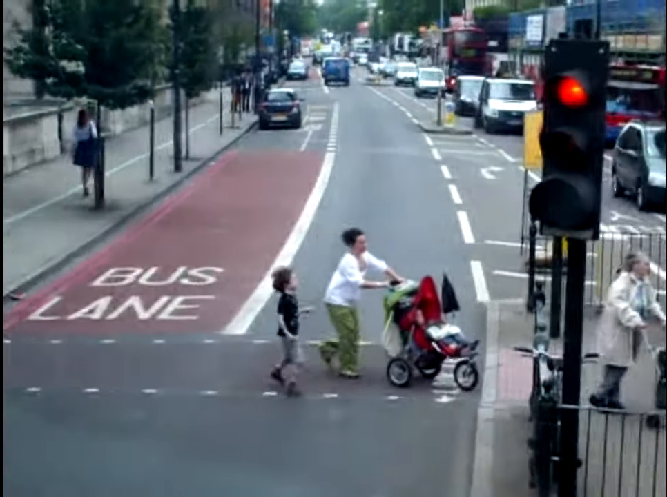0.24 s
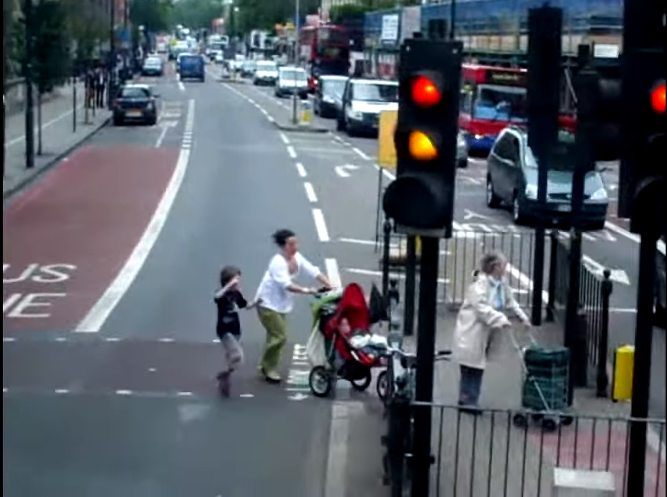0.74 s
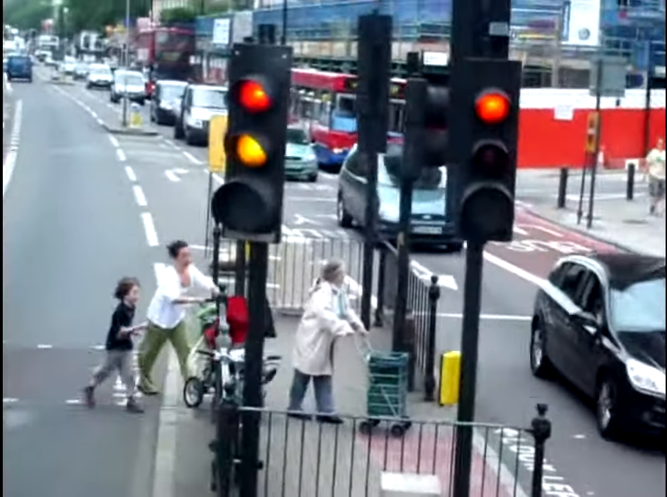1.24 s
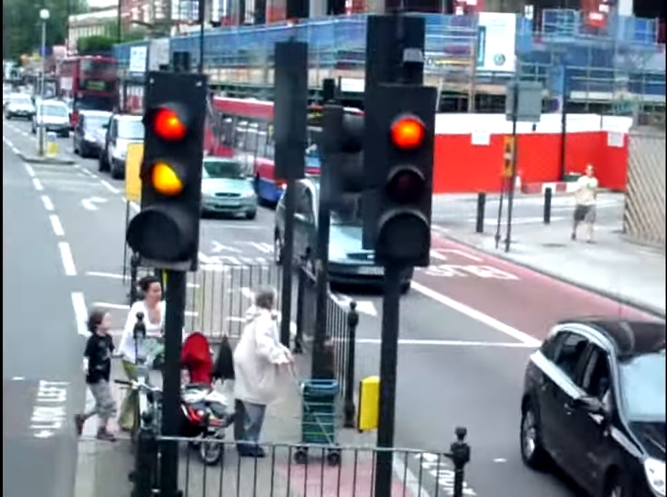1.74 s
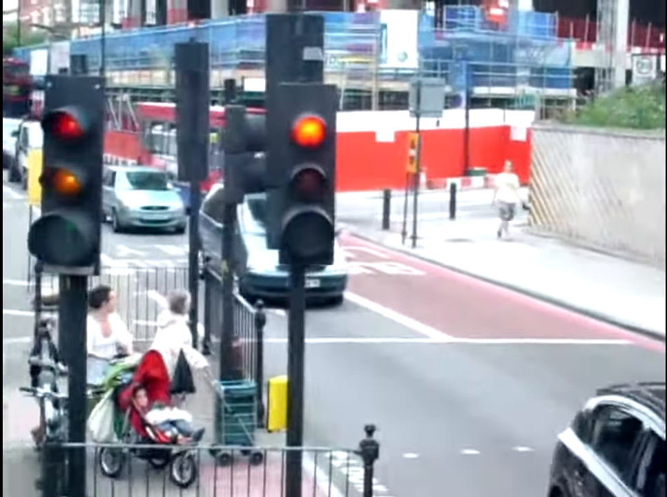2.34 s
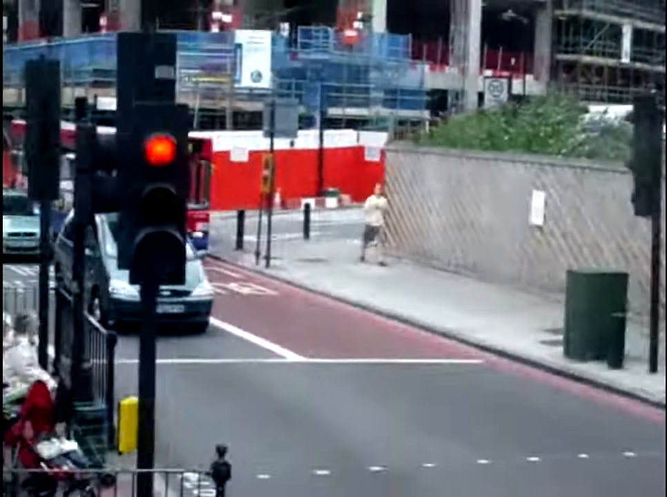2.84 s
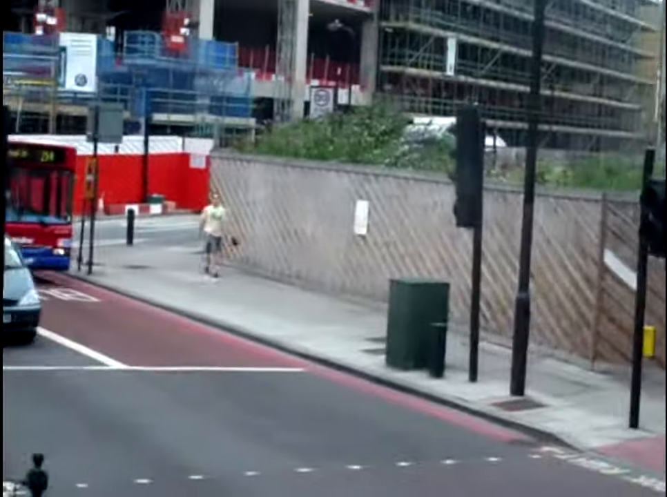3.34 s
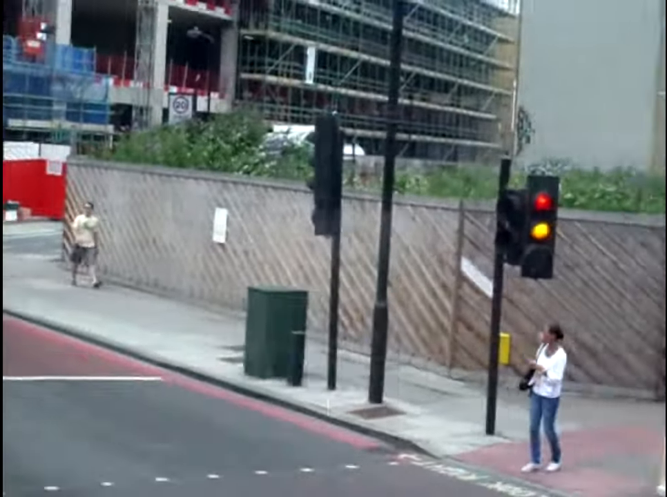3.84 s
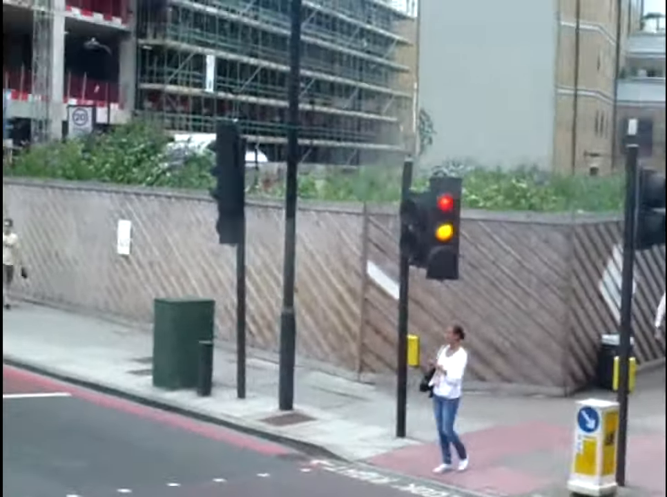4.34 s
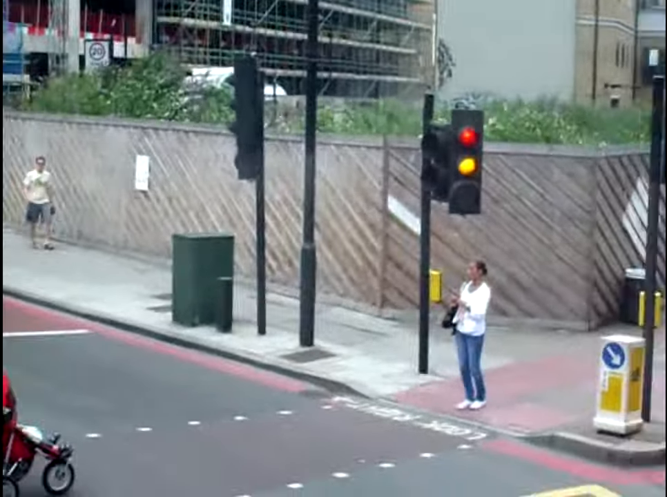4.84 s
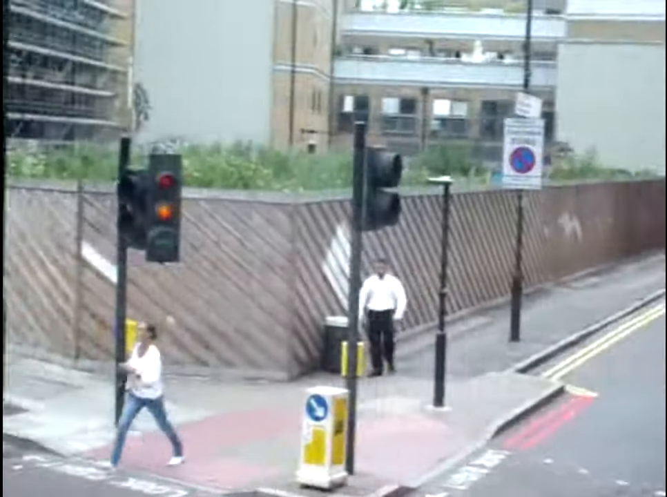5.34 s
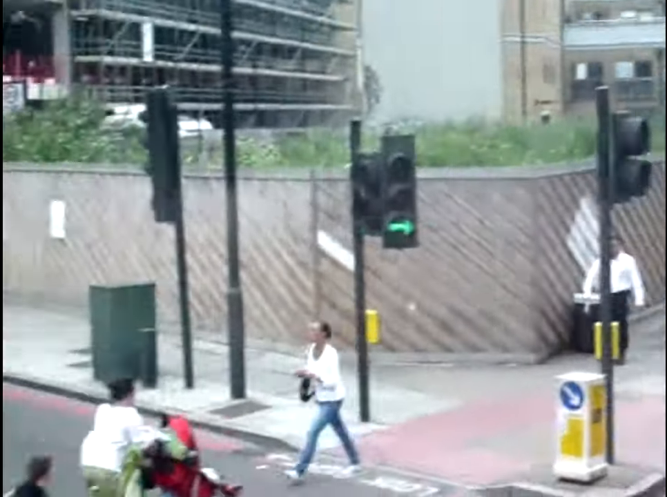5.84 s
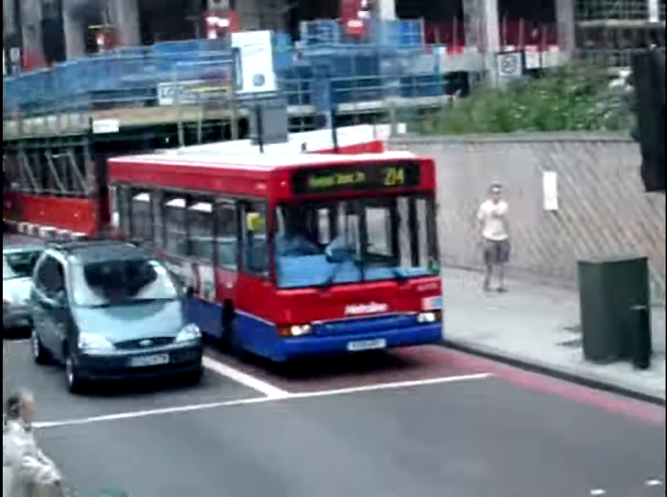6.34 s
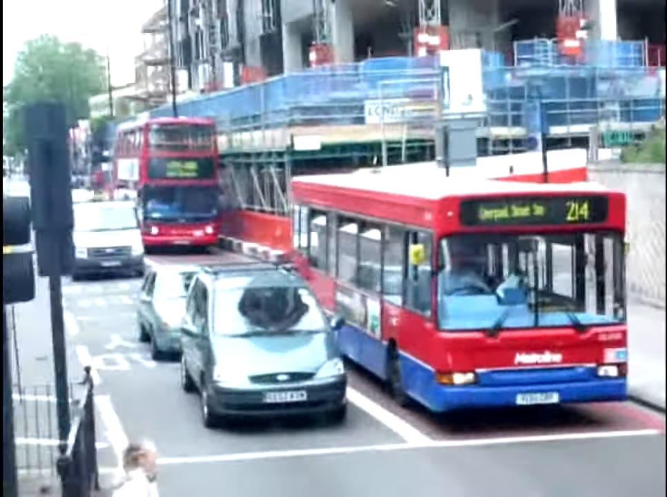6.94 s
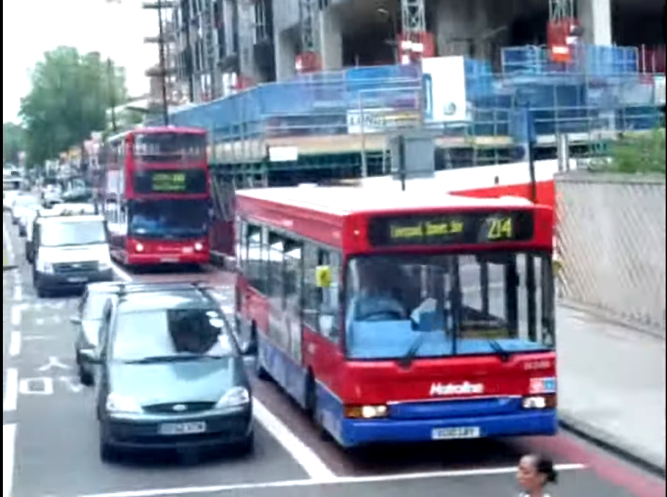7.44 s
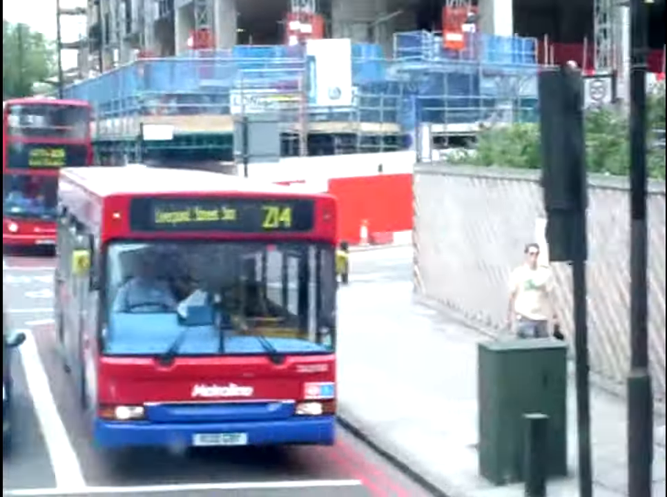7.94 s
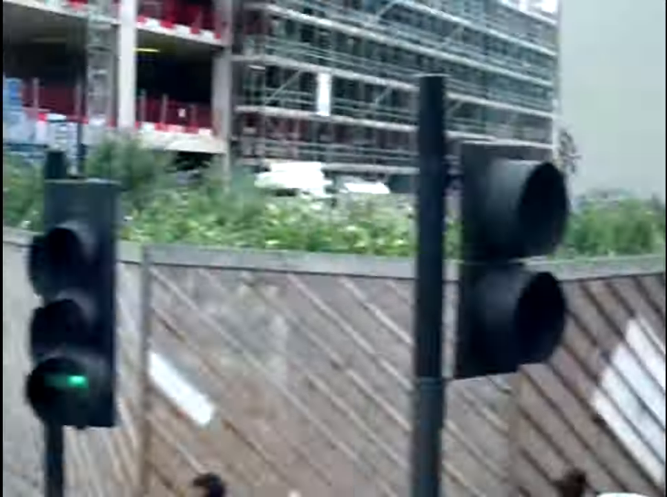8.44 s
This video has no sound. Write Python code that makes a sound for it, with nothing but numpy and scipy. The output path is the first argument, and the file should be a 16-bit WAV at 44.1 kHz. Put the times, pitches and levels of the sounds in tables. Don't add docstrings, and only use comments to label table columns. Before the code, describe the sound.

A small microphone in a bus cabin picks up low, booming engine idle over soft hiss. Distant brakes chirp thinly. Then the bus pulls away: the rumble lurches upward and keeps rising, noise from traffic and tyres grows, panels vibrate, loose trim clicks over bumps, and a fitting gives tiny high squeaks at the end.

```python
import sys
import numpy as np
from scipy import signal
from scipy.fft import rfft, irfft, next_fast_len
from scipy.io import wavfile
from scipy.ndimage import uniform_filter1d, map_coordinates

SR = 44100
rng = np.random.default_rng(int(sys.argv[2]) if len(sys.argv) > 2 else 0)


def to_wav(s):
    ch = np.atleast_2d(s).T
    pcm = np.round(np.clip(ch, -1, 1) * 32767)
    wavfile.write(sys.argv[1], SR, pcm.astype(np.int16))


def linear_from_db(decibels):
    return 10 ** (np.asarray(decibels, float) / 20)


N = 383669


def unit(x):
    return x / np.sqrt(np.mean(x ** 2) + 1e-20)


def along(points, hz):
    f, v = np.transpose(points)
    return np.interp(np.log(hz + 1), np.log(f + 1), v)


def curves(rows):
    s, *cols = np.transpose(rows)
    return [np.interp(np.arange(N) / SR, s, c) for c in cols]


def wobble(rate):
    return map_coordinates(rng.standard_normal(int(N * rate / SR) + 4), [np.arange(N) * rate / SR])


def bell(s, width):
    return np.exp(-((np.arange(N) / SR - s) / width) ** 2)


def filtered(x, response):
    m = next_fast_len(N + SR // 2)
    return irfft(rfft(x, m) * response(np.fft.rfftfreq(m, 1 / SR)), m)[..., :N]


def resonance(f, hz, width):
    return 1j * f * width / (hz * hz - f * f + 1j * f * width)


def rush(spectrum, patchy_db):
    z = signal.stft(rng.standard_normal(N), nperseg=512)[2]
    across_hz = uniform_filter1d(rng.standard_normal(z.shape), 6, 0)
    patches = unit(uniform_filter1d(across_hz, 14, 1))
    noise = signal.istft(z * linear_from_db(patchy_db * patches), nperseg=512)[1][:N]
    return unit(filtered(noise, lambda hz: linear_from_db(along(spectrum, hz))))


def tone(turns, db, flutter_db, smear, rate, free=1):
    phase = 2 * np.pi * (turns + free * rng.random()) + smear * wobble(rate)
    return np.sqrt(2) * linear_from_db(db + flutter_db * wobble(rate)) * np.cos(phase)


def glide(event, over_db, bend, edge_db, fall_db):
    s, length, from_hz, to_hz, db = event
    u = np.linspace(0, 1, 12)
    hz = from_hz + (to_hz - from_hz) * np.sin(bend * u) / np.sin(bend)
    level = db - edge_db * (2 * u - 1) ** 2 - fall_db * u
    return np.transpose([s + length * u, hz, *[level + d for d in over_db]])


def passing(rows, multiples, fade, **rough):
    hz, *levels = curves(rows)
    t = np.arange(N) / SR
    inside = np.minimum(t - rows[0][0], rows[-1][0] - t)
    gate = np.clip(inside / fade + 1, 0, 1)
    return gate * sum(tone(k * np.cumsum(hz) / SR, db, **rough) for k, db in zip(multiples, levels))


IDLE_HZ = 33
# time in seconds, firing rate in Hz.
ENGINE_SPEED = [(0, 33), (1.5, 32.85), (2.6, 32.8), (2.95, 32.95), (3.15, 34), (3.45, 36.8), (3.8, 41.2),
                (4.2, 45.6), (4.6, 49.2), (5, 53), (5.2, 54), (5.8, 58.1), (6.4, 62.1), (7.2, 68.2),
                (7.75, 69.7), (8.2, 72.9), (8.7, 76.5)]


def firing_rate():
    return curves(ENGINE_SPEED)[0]


# pitch in Hz, width in Hz, strength in dB.
AIR_MODES = [(25.4, 4.2, 4), (34, 4.9, -3.5), (42, 4.7, 0), (57.4, 2.9, 10.5), (112.1, 9, -1.5),
             (138.7, 4.55, -1), (150.7, 10, -0.5), (199.9, 9.8, 3), (252, 20, -6.5)]


def air_db(hz):
    hz, back = hz[::64], np.arange(len(hz)) / 64
    power = linear_from_db(2 * -13)
    power = power + sum(linear_from_db(2 * db) * np.abs(resonance(hz, c, w)) ** 2 for c, w, db in AIR_MODES)
    return np.interp(back, np.arange(len(hz)), 10 * np.log10(power))


# time in seconds, load in dB over idle.
FUEL = [(0, 0.5), (1.4, 0.5), (2.9, 2), (3.3, 0), (3.7, 2), (4.1, 1.5), (4.4, -6), (4.78, -0.5),
        (4.93, -16), (5.12, -10), (5.3, 0.5), (5.85, -0.5), (6.03, -0.5), (6.6, 4.5), (7.3, 2.5), (7.85, 6),
        (8.3, 2), (8.7, -5.5)]
BOOM_ORDERS = [.5, 1, 2, 3, 4]
# level at idle in dB, dB more once pulling,
# dB per octave of speed, dB per dB of load.
BOOM_LEVELS = [(-54.5, -0.5, 3.5, 1), (-25.5, 2.5, -6, 1), (-29.5, -6.5, 12, 0.48), (-30.5, -0.5, -9, 0.67),
               (-51.5, 10.5, 1.5, 1.45)]
# time in seconds, width in seconds, multiple of firing
# rate, dB more (negative: less).
TONE_SWELLS = [(4.08, .1, 1, 4), (4.5, .1, 1, 6), (4.82, .09, 1, 12), (3.45, .1, 1, -3), (5.3, .12, 2, 3),
               (6.4, .15, 2, -3), (6.15, 0.14, 1, -3.5), (6.55, .2, 1, -5.5), (8.5, .25, 1, -6),
               (3.6, .12, 3, 3), (3.1, .15, 2, 3.5), (3.95, .4, 2, 6.5), (8.45, .3, 2, -3),
               (3.15, .25, 3, -4), (4.55, .2, 3, 4), (4.95, .2, 3, -7.5), (5.7, .2, 3, 3.5),
               (7, .35, 3, 5), (10, .1, 3, 6), (3.02, 0.13, 4, -6), (5.3, .15, 4, 8), (6.7, .2, 4, 3),
               (7.5, .4, 4, -4)]
MINOR_ORDERS = [3 / 2, 5 / 2, 10 / 3, 7 / 2, 5, 20 / 3, 8, 10]
# level at idle in dB, dB per octave of speed.
MINOR_LEVELS = [(-42, -3.5), (-45, -8), (-46, -12), (-52, -2), (-64, 9), (-57.5, 0), (-57, 0), (-53, -5.5)]


def firing_boom(hz, fired):
    fuel_db, octaves = curves(FUEL)[0], np.log2(hz / IDLE_HZ)
    pulling = np.tanh(np.abs(octaves) / .06)
    lag = .1
    boom = 0
    for k, (idle_db, pull_db, rise_db, effort) in zip(BOOM_ORDERS, BOOM_LEVELS):
        db = idle_db + pull_db * pulling + rise_db * octaves + effort * fuel_db + air_db(k * hz)
        db = db + sum(more * bell(s, width) for s, width, order, more in TONE_SWELLS if round(order) == k)
        boom = boom + tone(k * fired - lag, db, flutter_db=1.63, smear=.13, rate=5, free=0)
    for k, (idle_db, rise_db) in zip(MINOR_ORDERS, MINOR_LEVELS):
        db = idle_db + rise_db * octaves + fuel_db
        boom = boom + tone(k * fired, db, flutter_db=1.7, smear=.25, rate=4)
    return boom


CYLINDERS = [0, -0.5, -2.5, -3, -0.5, 0.5]
# frequency in Hz, level in dB.
THROUGH_FLOOR = [(12, -41.5), (30, -3.5), (50, -2.5), (85, -7), (120, -6), (160, -19), (260, -18),
                 (400, -25), (700, -58), (1200, -160)]


def uneven_throb(hz, fired):
    at = np.flatnonzero(np.diff(np.floor(fired)))
    strength = linear_from_db(np.resize(CYLINDERS, len(at)) + .8 * rng.standard_normal(len(at)))
    uneven = np.zeros(N)
    uneven[at] = strength - strength.mean()
    thumps = unit(filtered(uneven, lambda f: linear_from_db(along(THROUGH_FLOOR, f))))
    return linear_from_db(-38.5 + 4 * np.log10(hz / IDLE_HZ)) * thumps


# time in seconds, level in dB.
GEAR_WHINE = [(0, -46), (1, -43), (1.5, -44), (2.2, -40.5), (2.55, -44), (2.9, -42), (3, -47), (3.1, -43),
              (3.2, -52), (3.32, -43.5), (3.45, -47)]


def gear_whine(hz):
    teeth = 22.93
    times = np.arange(0, GEAR_WHINE[-1][0], .05)
    mesh = [(s, teeth * hz[round(s * SR)], np.interp(s, *np.transpose(GEAR_WHINE))) for s in times]
    return passing(mesh, [1], fade=.08, flutter_db=1.3, smear=.15, rate=14)


def engine(hz, fired):
    return firing_boom(hz, fired) + uneven_throb(hz, fired) + gear_whine(hz)


# time in seconds, dB over the wait at the light.
TRAFFIC = [(0, -0.5), (1.7, -0.5), (2.6, 2), (3.4, 5.5), (3.9, 6.5), (4.25, 10.5), (5, 10), (5.6, 10.5),
           (5.9, 9), (6.2, 3), (7, 4), (7.9, 5.5), (8.1, 6), (8.7, 6.5)]


def outside():
    speedup = firing_rate() / IDLE_HZ - 1
    return curves(TRAFFIC)[0], 8.5 * np.tanh(speedup / 0.29)


# frequency in Hz, level in dB per Hz.
RUMBLE = [(6, -14.5), (13, -8), (18, -2), (24, 3), (32, -9.5), (45, -26), (70, -120)]
ROAD = [(20, -29), (35, -4), (55, -6), (85, -11), (120, -14), (150, -23.5), (240, -120)]
BODY = [(90, -120), (130, -7), (200, 2), (260, -3), (350, 1.5), (500, -1.5), (700, -6.5), (1000, -22),
        (1500, -120)]
ROAR = [(300, -120), (450, -6.5), (700, -3), (1050, -3.5), (1300, -9), (1800, -24), (2600, -120)]
HISS = [(700, -120), (1100, -16.5), (1400, -1.5), (1800, -2), (2200, -3), (3100, -11), (3700, -12.5),
        (4400, -17.5), (5000, -22), (5400, -27), (6500, -32), (7500, -37.5), (8000, -44.5), (9300, -53.5),
        (10400, -71)]
# time in seconds, width in seconds, level in dB.
BUMPS = [
    (4.2, 0.38, -33),
    (4.8, 0.24, -24.5),
    (5.39, 0.072, -18.5),
    (5.75, 0.066, -32.5),
    (6.15, 0.22, -27),
    (6.9, 0.26, -28.5),
    (7.5, 0.21, -26.5),
    (8.05, 0.24, -24),
    (8.33, 0.21, -25.5),
]


def cabin(fired):
    traffic_db, roll_db = outside()
    knock = lambda depth: unit(1 + depth * np.cos(np.pi * fired) ** 6)
    shared = wobble(4.7)
    jolts = linear_from_db(-31.5 + .1 * roll_db) + sum(linear_from_db(db) * bell(s, width) for s, width, db in BUMPS)
    rumble = jolts * rush(RUMBLE, patchy_db=.5)
    road = linear_from_db(-37.5 + 1.13 * roll_db) * rush(ROAD, patchy_db=-1.0)
    body = linear_from_db(-41.0 + roll_db + 0.15 * shared) * rush(BODY, patchy_db=0.25)
    roar_db = -45.5 + traffic_db + 0.34 * shared
    roar = linear_from_db(roar_db) * knock(0.089) * rush(ROAR, patchy_db=0.5)
    hiss_db = -50.5 + 0.19 * traffic_db + 0.49 * roll_db + 0.49 * shared + 0.16 * wobble(9.2)
    hiss = linear_from_db(hiss_db) * knock(.1) * rush(HISS, patchy_db=0.5)
    return rumble + road + body + roar + hiss


# pitch in Hz, width in Hz, steadiness from 0 to 1.
PANELS = [(51.6, 6, 1), (171, 14, 0.8), (257.4, 23, 0.4), (346.5, 24, 0), (688.6, 41, 0), (755, 15, 0.03),
          (2160, 370, 0.15), (3730, 840, 0.06)]
# hum at rest in dB, share of traffic dB, share of rolling dB.
PANEL_DRIVE = [(-38, -0.63, 1.55), (-63.5, -0.091, 2), (-52, 0.31, 0.74), (-51.5, -0.29, 0.63),
               (-58, 1, -0.3), (-57.5, .5, 0.22), (-62.5, .2, -0.63), (-69, 0.13, 0.48)]
# time in seconds, width in seconds, nearest panel in Hz, dB
PANEL_BUZZ = [(6, .3, 51, -13.5), (4.5, .1, 51, 5), (6.7, .1, 347, -8), (4.45, .3, 3770, 5.5),
              (6.4, .12, 3770, 7.5), (5.1, 0.25, 167, 8.5), (5.05, 0.13, 51, -14), (8, 0.14, 347, 6.5),
              (5.8, 0.3, 3770, 6.5), (8.15, 0.097, 3770, 8.5), (8.6, .3, 259, 4.5)]


def panels():
    total, (traffic_db, roll_db) = 0, outside()
    nearest = lambda f: min(PANELS, key=lambda p: abs(p[0] - f))[0]
    for (hz, width, steady), (rest_db, heard, rolled) in zip(PANELS, PANEL_DRIVE):
        db = rest_db + heard * traffic_db + rolled * roll_db
        db = db + sum(more * bell(s, w) for s, w, f, more in PANEL_BUZZ if nearest(f) == hz)
        shake = filtered(rng.standard_normal(N), lambda f: resonance(f, hz, width) ** 2)
        size = np.abs(signal.hilbert(shake, next_fast_len(N))[:N])
        total = total + linear_from_db(db) * unit(shake / (size + 1e-9) ** np.clip(steady, 0, 1))
    return total


# time in seconds, peak in dB.
TICKS = [(1.0834, -48), (2.1605, -43), (4.7406, -42), (5.1128, -43), (5.3991, -43), (7.1467, -43),
         (3.3797, -45), (4.1455, -41), (4.2140, -40), (4.2876, -33.5), (4.292, -38), (4.9313, -36.5),
         (5.183, -41), (6.569, -46), (6.764, -45), (8.1185, -40), (8.1694, -40), (8.25, -40), (8.335, -41)]
# pitch in Hz, width in Hz, level in dB.
TRIM = [(1300, 900, 6), (2500, 700, 5), (3400, 600, -1), (4600, 1500, -16), (6300, 2000, -31)]


def ticks():
    taps, t = np.zeros(N + SR), np.arange(SR // 40) / SR
    for s, db in TICKS:
        tap = linear_from_db(db + 10 - 60 * t / .018) * rng.standard_normal(len(t))
        taps[round(s * SR):][:len(t)] += tap
    trim = lambda f: sum((-1) ** k * linear_from_db(db) * resonance(f, c, w) for k, (c, w, db) in enumerate(TRIM))
    knocks = rng.random(N) < 45 / SR
    loose = knocks * linear_from_db(2 * rng.standard_normal(N) + .6 * outside()[0] - 43)
    rattle = filtered(loose, lambda f: resonance(f, 5200, 3500) ** 2)
    ticking = filtered(taps[:N], lambda f: trim(f) / (1 + (f / 6500) ** 12))
    return ticking + filtered(rattle, lambda f: 1 / (1 + (f / 6500) ** 14))


# start in seconds, length in seconds, from Hz, to Hz, level in dB.
BRAKES = [
    (.53, .24, 1420, 1428, -49.5),
    (.78, .2, 1440, 1430, -56),
    (1.15, .3, 1430, 1440, -55),
    (1.48, .12, 1440, 1442, -52),
    (1.43, .22, 1295, 1330, -57),
    (2.3, .14, 1410, 1415, -55),
    (6.65, .4, 1345, 1308, -52),
]
SHRILL_BRAKES = [
    (1.66, .24, 1385, 1392, -52),
    (1.93, .33, 1400, 1404, -53),
]
FITTING = [
    (8.13, .05, 3400, 3350, -57),
    (8.228, .05, 3480, 3455, -52),
    (8.452, .034, 3540, 3445, -43),
    (8.497, .026, 3450, 3430, -46.5),
    (8.558, .03, 3455, 3452, -52),
    (8.608, .025, 3520, 3500, -52),
]


def squeals():
    brakes = [glide(e, [0, -22], bend=.8, edge_db=5, fall_db=1.5) for e in BRAKES]
    brakes += [glide(e, [0, -10], bend=1.6, edge_db=6, fall_db=-1) for e in SHRILL_BRAKES]
    fitting = [glide(e, [0, -31], bend=1.5, edge_db=0, fall_db=6) - [0, 0, 4, 4] for e in FITTING]
    sound = sum(passing(rows, [1, 2], fade=.034, flutter_db=2.2, smear=.6, rate=30) for rows in brakes)
    return sound + sum(passing(rows, [1, 2.17], fade=.004, flutter_db=3, smear=.8, rate=120)
                       for rows in fitting)


# start in seconds, length in seconds, from Hz, to Hz, level in dB.
TAKE_UP = [
    (2.92, 0.57, 38.7, 40.6, -21),
]
LURCHES = [
    (3.6, .5, 40, 54, -20.5),
    (4.1, .58, 46, 57.5, -22.5),
]
SHAFT = [
    (5.45, 1.65, 32, 79.5, -21.5),
    (7.95, .75, 76, 87, -29),
    (8.07, .34, 455, 500, -34.5),
]


def driveline():
    glides = [glide(e, [0], bend=1.63, edge_db=3.0, fall_db=0.0) for e in TAKE_UP]
    glides += [glide(e, [0], bend=2.45, edge_db=-1, fall_db=8) + [0, 0, 2] for e in LURCHES]
    glides += [glide(e, [0], bend=.95, edge_db=5, fall_db=5) for e in SHAFT]
    return sum(passing(rows, [1], fade=.06, flutter_db=1.1, smear=.12, rate=8) for rows in glides)


# start in seconds, length in seconds,
# from Hz, to Hz, level in dB.
PANES = [(3.82, .08, 752, 750, -40), (4.08, .14, 746, 752, -42), (4.49, .14, 750, 755, -39),
         (4.68, .12, 750, 752, -35.5), (4.87, .19, 754, 755, -40), (5.24, .08, 760, 764, -42),
         (5.43, .22, 758, 752, -38), (4.47, .3, 670, 700, -39), (5.17, .07, 722, 718, -41),
         (5.43, .11, 566, 572, -40), (5.75, .08, 690, 686, -38), (5.84, .06, 640, 632, -40),
         (6.15, .08, 712, 704, -44), (6.3, .1, 682, 678, -44), (6.22, .14, 522, 514, -43.5),
         (5.64, .06, 725, 715, -41), (5.9, .06, 680, 672, -42), (5.96, .1, 345, 355, -39),
         (6.12, .3, 346, 344, -42), (4.7, .27, 80, 86, -36), (5.1, .55, 80, 84, -34),
         (5.85, .3, 90, 100, -37), (3.65, .45, 255, 287, -42), (4.8, .45, 250, 275, -43),
         (7.55, .25, 160, 170, -35.5), (7.25, .22, 303, 318, -41), (7.7, .26, 338, 322, -41),
         (8.35, .12, 368, 378, -40), (8.52, .18, 505, 488, -41), (7.98, .1, 535, 537, -42),
         (6.7, .2, 425, 442, -43)]


def panes():
    glides = [glide(e, [0], bend=1.2, edge_db=4, fall_db=0) for e in PANES]
    return sum(passing(rows, [1], fade=.03, flutter_db=1.5, smear=.35, rate=20) for rows in glides)


def scene():
    hz = firing_rate()
    fired = np.cumsum(hz) / SR
    ride = engine(hz, fired) + cabin(fired) + panels() + ticks()
    return (ride + squeals() + driveline() + panes())[None]


def roll_off(x):
    return signal.sosfilt(signal.butter(12, 10300, fs=SR, output="sos"), x)


def record(dry):
    settled = dry * np.minimum(np.arange(N) / (.002 * SR), 1)
    return roll_off(settled)


dry = scene()
out = record(dry)
to_wav(out)
```